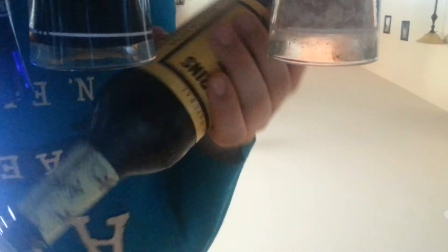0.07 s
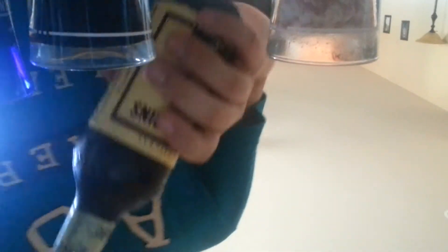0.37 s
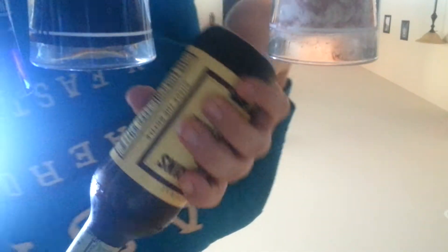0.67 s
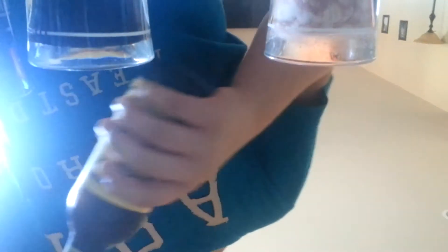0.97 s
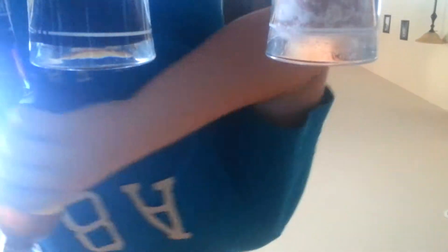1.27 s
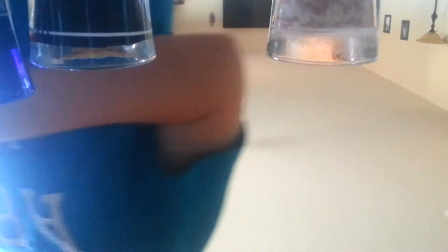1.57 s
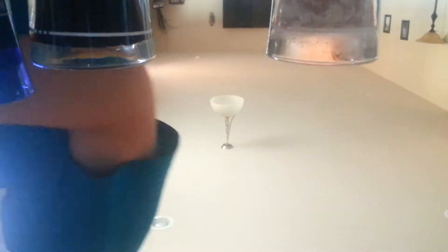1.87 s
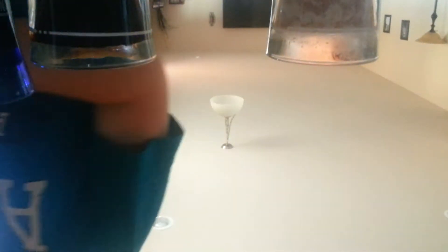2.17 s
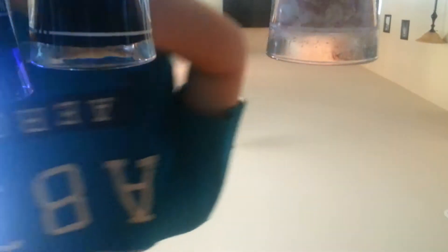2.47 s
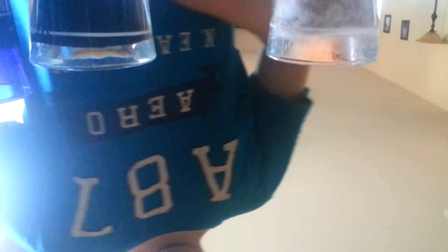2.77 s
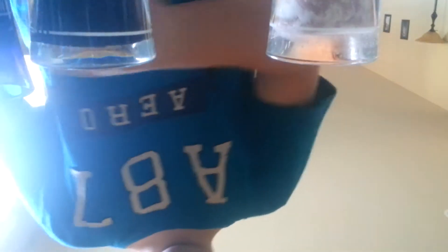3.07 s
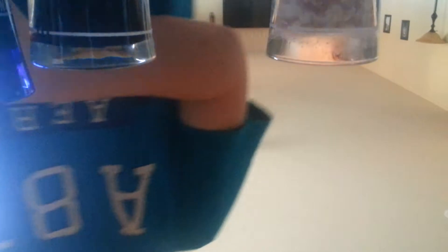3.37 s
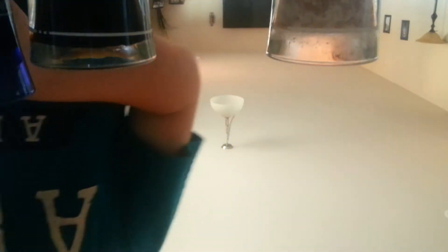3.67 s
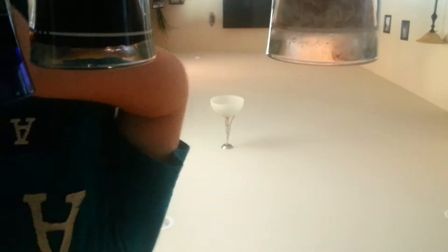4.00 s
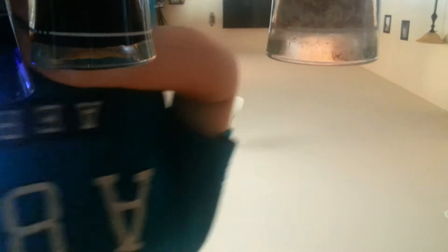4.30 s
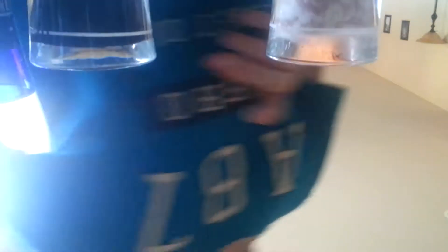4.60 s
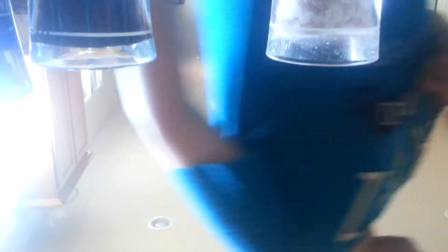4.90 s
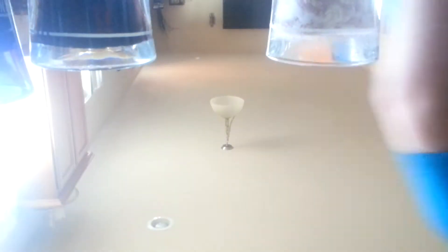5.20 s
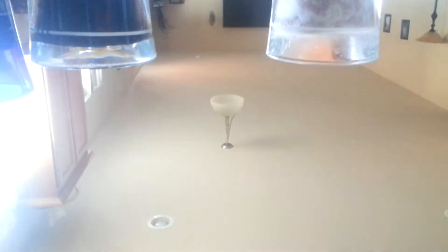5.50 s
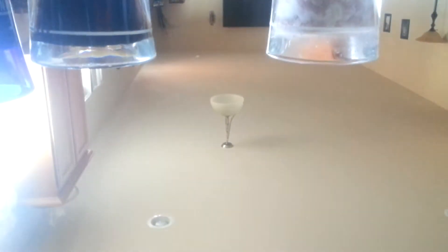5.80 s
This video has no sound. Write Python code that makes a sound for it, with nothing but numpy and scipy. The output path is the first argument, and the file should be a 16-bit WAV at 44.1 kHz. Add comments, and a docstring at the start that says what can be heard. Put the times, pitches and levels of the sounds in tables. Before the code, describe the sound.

Heard from a glass tabletop in a hard-walled room, a few small drips from a bottle and a single thudding knock give way to light finger ticks on glass. Bottles and small glasses then come down in quick, loud knocks, some with a bright ringing rim. A short lull leaves only faint room noise, and finally objects scrape briefly over the table with a handful of quieter, dull taps.

```python
"""A quiet room rush and a faint glass ring come first; then a tipped bottle drips and fingers tick on glass.
Bottles and shot glasses are set down on a glass table in a hard-walled room, heard from the tabletop.
Each knock shakes the plate, comes back from the ceiling and dies in the room, coloured by the weight
and hardness of the contact. Soft bumps swing the table and skin rubs on the bottle. At the end,
things are shifted across the plate among softer, duller taps."""
import sys
import numpy as np
from scipy import signal
from scipy.fft import rfft, irfft, next_fast_len
from scipy.io import wavfile

SR = 44100
rng = np.random.default_rng(int(sys.argv[2]) if len(sys.argv) > 2 else 0)


def dump_mix(stems):
    """Bounce the given channels to the path in sys.argv[1] as a 16-bit WAV at rate SR."""
    frames = np.atleast_2d(stems).T  # one column per channel
    limited = np.clip(frames, -1, 1)  # hard clip at full scale
    pcm = np.round(limited * 32767).astype(np.int16)
    wavfile.write(sys.argv[1], SR, pcm)


N = 257984
SCENE_T = np.arange(N) / SR
EVENT_T = np.arange(24576) / SR  # seconds within one hit or ring


def amp(db):
    """Decibels to gain."""
    return 10 ** (np.asarray(db) / 20)


def unit(x):
    """Scaled to rms 1."""
    return x / np.sqrt(np.mean(x ** 2) + 1e-20)


def along(points, hz):
    """A breakpoint curve read on a log frequency axis."""
    freqs, values = np.transpose(points)
    return np.interp(np.log(hz + 1), np.log(freqs + 1), values)


def peak(hz, centre, width):
    """Bell shape of a resonance, 1 at its centre."""
    return 1 / (1 + (2 * (hz - centre) / width) ** 2)


def shelf(hz, corner_hz, order=4):
    """Smooth step from 0 below the corner to 1 above it."""
    return hz ** order / (hz ** order + corner_hz ** order)


def coloured(x, gain_db):
    """Minimum-phase EQ: resonances ring after the hit, never before it."""
    size = 2 * next_fast_len(x.shape[-1] // 2 + SR // 10)
    gain = amp(gain_db(np.fft.rfftfreq(size, 1 / SR)))
    cepstrum = irfft(np.log(np.maximum(gain, 1e-6)))
    cepstrum[1:size // 2] *= 2
    cepstrum[size // 2 + 1:] = 0
    return irfft(rfft(x, size) * np.exp(rfft(cepstrum)))[..., :x.shape[-1]]


def diffuse(size, mic_spacing_m=.15):
    """White noise arriving from all sides: alike at the two mics only for long waves."""
    hz = np.fft.rfftfreq(size, 1 / SR)
    coherence = .93 * np.sinc(2 * hz * mic_spacing_m / 343)
    spread = np.arccos(coherence) / 2
    white = rfft(rng.standard_normal((2, size)))
    mid, side = irfft(white * [np.cos(spread), np.sin(spread)], size)
    return np.array([mid + side, mid - side])


def noise(gain_db):
    """Steady diffuse noise of rms 1 with a given spectrum."""
    size = next_fast_len(N, True)
    gain = amp(gain_db(np.fft.rfftfreq(size, 1 / SR)))
    return unit(irfft(rfft(diffuse(size)) * gain, size)[:, :N])


def add(track, start_s, sound):
    """Mix a sound in at its start time."""
    part = track[:, max(round(start_s * SR), 0):][:, :sound.shape[-1]]
    part += sound[..., :part.shape[-1]]


# Reverb time of the hard-walled room: freq_hz, t60_s
ROOM_DECAY = [(80, 0.42), (200, 0.6), (500, 0.57), (1200, 0.59), (3000, 0.56), (6000, 0.62), (13000, 0.5)]
def room_fade(t, hz):
    """The walls soak up each frequency at its own rate."""
    return amp(-60 * t / along(ROOM_DECAY, hz))


def ringing(rows, rise_per_s, room_db, attack_s=.00071):
    """Damped tones with their reverb; a rise bends the pitch up as they fade."""
    out = np.zeros((2, N))
    t = EVENT_T
    for start_s, pitch_hz, level_db, t60_s in rows:
        envelope = amp(level_db - 60 * t / t60_s) * (1 - np.exp(-t / attack_s))
        ring = envelope * np.sin(2 * np.pi * pitch_hz * t * (1 + rise_per_s * t / 2))
        tail = rng.standard_normal((2, len(t))) * room_fade(t, pitch_hz)
        reverb = signal.fftconvolve(ring[None], tail, axes=1)[:, :len(t)]
        add(out, start_s, ring + amp(room_db) * ring.std() * unit(reverb))
    return out


def impact(direct_db, ceiling_db, contact_s, seat_s=.0014, left_lead_s=.00032, ceiling_s=.012):
    """A white crack that reaches the left mic first, its duller ceiling echo and the room's tail."""
    t = EVENT_T
    delayed = lambda x, delay_s: np.pad(x, (round(delay_s * SR), 0))[:len(t)]
    hz, frame_s, bands = signal.stft(diffuse(len(t)), SR, nperseg=256)
    tail = signal.istft(bands * room_fade(frame_s, hz[:, None]), SR, nperseg=256)[1][:, :len(t)]
    tail *= 1 - np.exp(-t / .00048)
    # the contact seats itself in a quick chatter
    chatter = np.exp(-t / contact_s) * (1 - np.exp(-t / seat_s))
    crack, echo = rng.standard_normal((2, len(t))) * chatter
    direct = np.array([crack, .8 * delayed(crack, left_lead_s)])
    echo = signal.lfilter([.06], [1, -.94], delayed(echo, ceiling_s))  # low-pass
    return amp(direct_db) * direct + amp(ceiling_db) * echo + tail


# Tone of the room at rest: freq_hz, gain_db
RUSH_EQ = [(25, -37), (86, -8), (181, -3), (335, -8), (700, -10), (1000, -14), (1450, -16), (1720, -27),
           (2050, -21.5), (2900, -22), (3400, -26), (5000, -31), (6100, -36), (14500, -34.5)]
# A distant fan's tones above the rush: pitch_hz, boost_db
FAN_TONES = [(651, 6), (780, 11)]
# Fader on the rush, easing down a touch late on: time_s, level_db
RUSH_FADER = [(3.9, -46), (4.7, -46.5)]
def room_rush(fan_width_hz=16):
    """A bed of room air with two narrow fan tones."""
    fan = lambda f: sum(boost_db * peak(f, hz, fan_width_hz) for hz, boost_db in FAN_TONES)
    level_db = np.interp(SCENE_T, *np.transpose(RUSH_FADER))
    return amp(level_db) * noise(lambda f: along(RUSH_EQ, f) + fan(f))


# Thin glass rims: start_s, pitch_hz, level_db, t60_s
RIM_RINGS = [(0.0, 4780, -57.5, 0.14), (0.211, 4800, -59, 0.17), (2.202, 1910, -41, 0.18),
             (2.657, 3820, -37, 0.14), (3.092, 2790, -26, 0.15), (3.092, 2950, -31, 0.27),
             (3.092, 3210, -35.5, 0.21), (3.577, 2265, -18.5, 0.036), (5.435, 4240, -54, 0.21)]
def rim_rings():
    """A thin rim keeps ringing at one steady pitch."""
    return ringing(RIM_RINGS, rise_per_s=0, room_db=0)


# Drops and bubbles in the bottle neck: start_s, pitch_hz, level_db, t60_s
BOTTLE_DRIPS = [(0.182, 468, -40.5, 0.21), (0.184, 3530, -52, .05), (0.212, 1910, -37.5, 0.045),
                (0.279, 2065, -41.5, 0.09), (0.314, 1500, -49, 0.1), (2.399, 2074, -30, 0.05),
                (2.598, 2000, -35, 0.036)]
def bottle_drips():
    """Each drop or bubble rings briefly, its pitch creeping up."""
    return ringing(BOTTLE_DRIPS, rise_per_s=.5, room_db=-1)


# Tone shared by the ticks: freq_hz, gain_db
TICK_EQ = [(200, -11), (900, -8), (1300, 11), (2300, 1.5), (3200, -8.5), (4400, -3.5), (6000, -23),
           (10000, -16.5), (15000, -29)]
# Light ticks on glass and one tiny, high drip chirp: start_s, level_db, pitch_hz, resonance_db
LIGHT_TICKS = [(0.209, -44.5, 2400, 11), (0.3, -49, 4300, 17), (0.749, -38, 4300, 9),
               (0.828, -33.5, 1480, -4.5), (0.860, -46, 1290, 3), (1.244, -44, 2060, 7),
               (1.357, -42.5, 2960, 10), (1.658, -48, 3450, 12), (2.321, -41, 13200, 15),
               (2.374, -41, 8100, 23)]
def light_ticks(relative_width=.17):
    """Small, close transients with one resonance each, too weak to move the plate."""
    out = np.zeros((2, N))
    for start_s, level_db, pitch_hz, resonance_db in LIGHT_TICKS:
        resonance = lambda f: resonance_db * peak(f, pitch_hz, relative_width * pitch_hz)
        tick = impact(direct_db=20, ceiling_db=8, contact_s=.005)
        tick = coloured(tick, lambda f: along(TICK_EQ, f) + resonance(f))
        attack_rms = tick[:, :SR // 100].std()
        add(out, start_s, amp(level_db) * tick / attack_rms)
    return out


# Tone of a glass foot meeting the plate: freq_hz, gain_db
FOOT_EQ = [(25, -27), (50, -23), (75, -5), (200, 4), (420, 7), (700, 3), (1000, -3.5), (2000, -5),
           (4000, -18), (5000, -24.5), (6200, -32), (10500, -36), (13000, -48), (16000, -83)]
# Resonances and hollows of the table as the mics hear it, with a notch near 1.7 kHz:
# centre_hz, width_hz, gain_db
TABLE_EQ = [(79, 12, 5), (102, 31, -4), (137, 23, 6), (194, 107, 1), (327, 22.6, -12.5), (388.4, 14, 4.5),
            (436, 72, 5), (676, 155, 4.5), (765, 46, 3.5), (1140, 200, 3.5), (1415, 876, 13),
            (1702, 360, -12.5), (4400, 300, 2)]
def table_db(f):
    """Tone of the table driven by a glass foot, as the mics hear it."""
    return along(FOOT_EQ, f) + sum(db * peak(f, hz, width) for hz, width, db in TABLE_EQ)


# Bottles and glasses set down:
# start_s, level_db, weight_db, hardness_db, pitch_hz, resonance_db, direct_db
TABLE_KNOCKS = [(0.356, -17, 0.5, 10.5, 494, 4, -11), (2.201, -13, 3, 12, 812, 8.5, 7),
                (2.252, -25, -6, 14.5, 3000, 0, 23), (2.426, -23.5, 5, 7, 423, -0.5, 11),
                (2.656, -13, 0, 8, 750, 9.5, 10), (2.899, -27.5, 3.5, 12, 820, -5.5, 9.5),
                (3.092, -18, 2.5, 14, 1050, 6.5, 12.5), (3.273, -38.5, 11, 13, 432, 4, 4),
                (3.345, -28.5, 3, 13.5, 730, 6, 8), (3.577, -21, -1.5, 15, 1480, 8.5, 6),
                (4.946, -39, -5, 3.5, 866, 5.5, 9), (5.138, -40, 0, -1, 694, 3, 16),
                (5.224, -33.5, 21, 11, 426, 9.5, 10), (5.312, -31.5, 12.5, 15, 434, 6, 12),
                (5.433, -28, 17.5, 16, 450, 12, 9), (5.499, -33.5, 5, -10, 453, 9.5, 18),
                (5.704, -35, 13, 17.5, 380, 5.5, -9)]
def table_knocks(weight_hz=278, hardness_hz=2265, relative_width=.25, attack_s=.05):
    """Every knock rings the same plate: weight adds bass, hardness treble, the vessel one resonance."""
    out = np.zeros((2, N))
    for start_s, level_db, weight_db, hardness_db, pitch_hz, resonance_db, direct_db in TABLE_KNOCKS:
        force = lambda f: weight_db * (1 - shelf(f, weight_hz)) + hardness_db * shelf(f, hardness_hz)
        vessel = lambda f: resonance_db * peak(f, pitch_hz, relative_width * pitch_hz)
        knock = impact(direct_db, ceiling_db=12.5, contact_s=.0022)
        knock = coloured(knock, lambda f: table_db(f) + force(f) + vessel(f))
        attack_rms = knock[:, :round(attack_s * SR)].std()
        add(out, start_s, amp(level_db) * knock / attack_rms)
    return out


# Soft bumps against the table: middle_s, pitch_hz, level_db, half_length_s
TABLE_BUMPS = [(0.385, 157, -26, 0.026), (2.54, 152, -18, 0.006)]
def table_bumps():
    """A soft push swings the table, and the mics standing on it, for a few cycles."""
    out = np.zeros(N)
    for middle_s, pitch_hz, level_db, half_length_s in TABLE_BUMPS:
        t = SCENE_T - middle_s
        out += amp(level_db) * np.exp(-(t / half_length_s) ** 2) * np.cos(2 * np.pi * pitch_hz * t)
    return out


def strokes(rows):
    """Envelope of sliding strokes: each swells and fades in a bell curve."""
    return sum(amp(level_db) * np.exp(-(2 * (SCENE_T - middle_s) / length_s) ** 2)
               for middle_s, length_s, level_db in rows)


# Tone of skin sliding on glass: freq_hz, gain_db
SKIN_EQ = [(800, -24), (1800, -5), (2500, -2.5), (4500, -9), (6500, -21), (14000, -21)]
# Fingers sliding on the bottle: middle_s, length_s, level_db
FINGER_RUBS = [(0.995, 0.084, -51.5), (1.095, .07, -52), (1.34, 0.11, -52.5), (1.66, .08, -56.5)]
def finger_rubs():
    """Skin friction on the bottle gives short, soft hisses."""
    return strokes(FINGER_RUBS) * noise(lambda f: along(SKIN_EQ, f))


# Things shifted across the table: middle_s, length_s, level_db
TABLE_DRAGS = [(4.73, 0.3, -47), (5.4, 0.23, -36.5), (5.82, 0.18, -42)]
def table_drags():
    """Sliding friction shakes the plate and takes on its tone."""
    return strokes(TABLE_DRAGS) * noise(table_db)


def scene():
    """Everything on and around the table, over the room rush."""
    return (room_rush() + rim_rings() + bottle_drips() + light_ticks()
            + table_knocks() + table_bumps() + finger_rubs() + table_drags())


def record(dry, top_hz=14900):
    """Hard clipping at full scale, then a brick-wall low-pass."""
    size = next_fast_len(N + SR // 10)
    passband = np.fft.rfftfreq(size, 1 / SR) < top_hz
    return irfft(rfft(np.clip(dry, -1, 1), size) * passband, size)[:, :N]


dry = scene()
out = record(dry)
dump_mix(out)
```